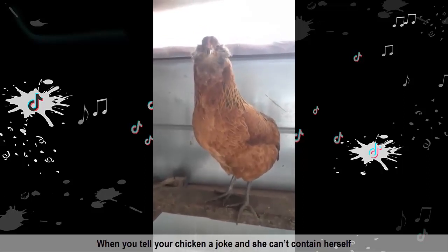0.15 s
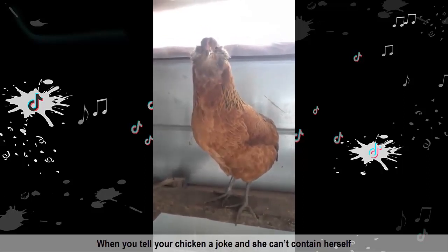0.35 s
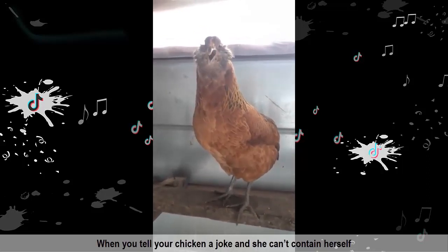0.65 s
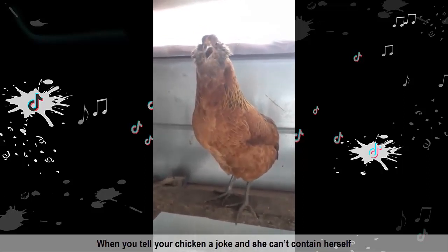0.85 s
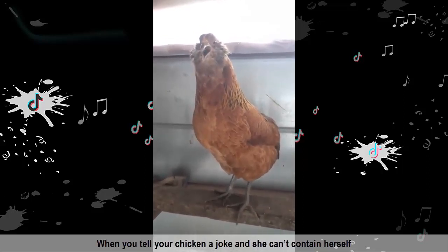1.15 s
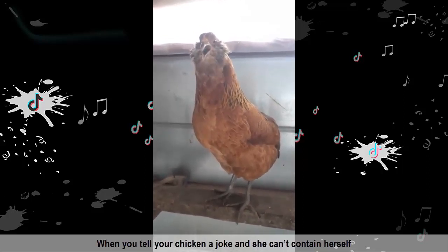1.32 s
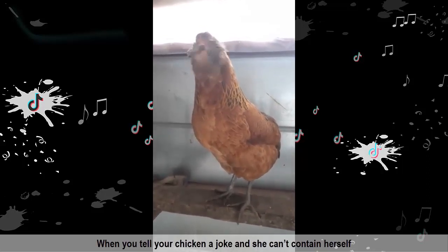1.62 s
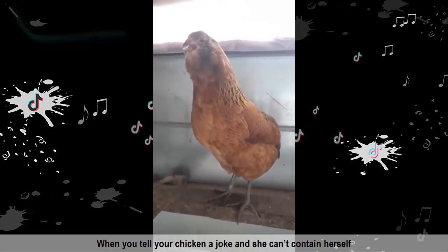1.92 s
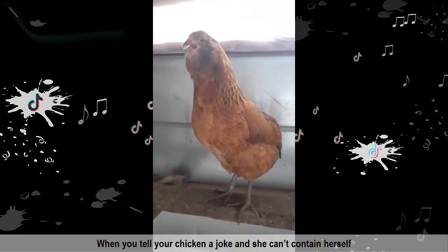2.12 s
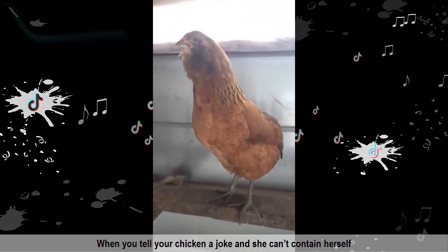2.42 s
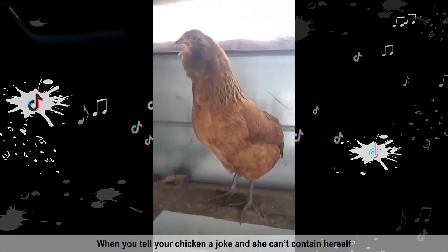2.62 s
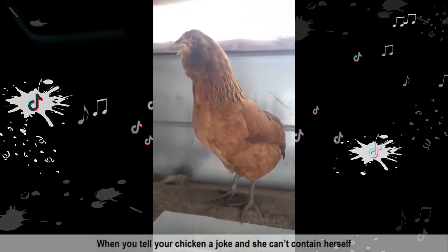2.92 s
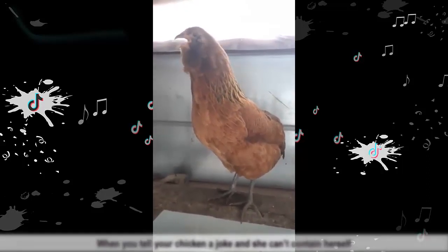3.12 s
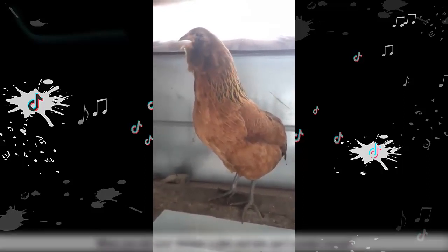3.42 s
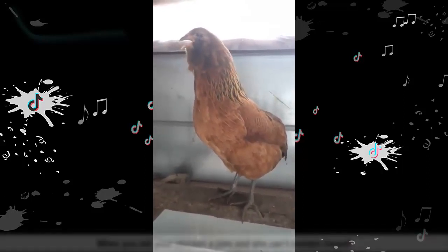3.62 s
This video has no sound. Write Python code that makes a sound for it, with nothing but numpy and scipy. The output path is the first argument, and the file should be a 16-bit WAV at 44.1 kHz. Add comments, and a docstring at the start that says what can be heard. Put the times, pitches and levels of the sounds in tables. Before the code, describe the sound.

Close stereo pickup of a hen in a small coop: a brief quiet start, a growing raspy squawk, then about six clucks per second, dipping softer midway and turning clearer, with a few soft thumps.

```python
"""Hen squawking in a coop

A hen in a small coop gives one swelling squawk, then a fast run of clucks, close to a two-port microphone.
Her voice is a train of pulses and puffs of noise, shaped by throat and beak: low and hoarse, then higher.
Random echoes make the coop's short tail. Shaped noise makes a low rumble with faint hiss,
and dying sine waves make a few soft thumps."""
import sys
import numpy as np
from scipy import signal
from scipy.fft import rfft, irfft
from scipy.io import wavfile
from scipy.ndimage import uniform_filter1d

SR = 44100
rng = np.random.default_rng(int(sys.argv[2]) if len(sys.argv) > 2 else 0)


def generate_wav(signal):
    """Clip the signal to [-1, 1] and save it as 16-bit WAV at the path in sys.argv[1]."""
    frames = np.transpose(np.atleast_2d(signal))
    scaled = np.clip(frames, -1, 1) * 32767
    pcm = np.round(scaled).astype(np.int16)
    wavfile.write(sys.argv[1], SR, pcm)


N = 165375  # length in samples

# The opening squawk. Each row: time in seconds, pitch in Hz, level in dB, roughness 0-1, beak opening 0-1.
SQUAWK = [(.318, 350.9, -74, 0.32, 0.3), (0.327, 358.4, -34, 0.33, 0.12), (.345, 340.3, -34.5, 0.42, 0.2),
          (.37, 343.7, -39.5, 0.51, 0.14), (.385, 352.7, -31.5, 0.28, 0.12),
          (0.399, 179.5, -29.5, 0.54, 0.25), (0.439, 200.1, -29.5, 0.7, 0.29), (.5, 219, -27, 0.6, 0.42),
          (0.574, 240.2, -20.5, .8, 0.64), (0.589, 252.1, -17.5, 0.31, 0.47), (.66, 266, -17, 0.28, 0.99),
          (.69, 282.3, -15.5, 0.75, 0.9), (.705, 425.4, -15, 0, 0.92), (.755, 440, -13, .15, 0.9),
          (0.774, 440.3, -15.5, 0.67, 1), (.81, 449.6, -12, 0.2, 0.85), (.83, 456.7, -14, 0.1, 1),
          (0.879, 446.1, -13, 0.04, 0.96), (.915, 461.2, -14, 0.11, 1), (.93, 459.8, -11, 0.2, 0.97),
          (.955, 455, -16.5, 0.31, 0.97), (0.971, 461, -13.5, .6, 0.97)]
# The clucks. Each row: start in seconds, length in seconds, then pitch in Hz, level in dB and roughness 0-1
# of the low part, time of the flip in seconds after the start, then the same three for the high part.
CLUCKS = [(.972, .105, 304.7, -18, .45, .056, 522.4, -13.5, .85),
          (1.126, .125, 288.3, -18, 0.37, .085, 467.5, -13.5, 0.61),
          (1.302, 0.11, 290.8, -18, .45, .085, 459, -12, 0.66),
          (1.475, .115, 300.6, -18.5, 0.585, .075, 454.5, -18, 0.42),
          (1.645, .105, 296.1, -19, 0.56, .085, 439.4, -21.5, 0.84),
          (1.804, .1, 310.9, -19.5, .55, .085, 442.2, -23.5, 0.9),
          (1.964, .085, 314.7, -20, 0.7, .075, 442.7, -47, 0.79),
          (2.121, .09, 276.7, -20, 0.507, .08, 438.8, -29, 0.94),
          (2.28, .125, 292.9, -19.5, 0.3136, .105, 439.4, -18.5, 0.81),
          (2.478, .1, 301.3, -19, .5, .065, 454.5, -13, 0.21),
          (2.65, 0.096, 306.3, -18.5, .55, .072, 449.7, -12.5, 0.28),
          (2.846, 0.1, 301.4, -18.5, 0.6, .072, 458.4, -10.5, 0.34),
          (3.031, .112, 308.3, -18.5, 0.65, .062, 464.7, -11.5, 0.31),
          (3.218, .1, 334.1, -18.5, 0.85, 0.036, 460.9, -11.5, 0.24),
          (3.39, .1, 323.2, -18.5, 0.443, .045, 472.8, -11.5, 0.17),
          (3.566, 0.11, 321.5, -19.5, 0.644, 0.031, 453.8, -12.5, 0.079),
          (3.743, .1, 296, -26.5, 0.35, 0.057, 452, -12, 0.16)]
# Tone of the throat and open beak. Each row: frequency in Hz, gain in dB.
THROAT = [(100, -46), (300, -26), (450, -14), (620, -14), (780, -6.5), (950, -3), (1150, -4), (1370, -2.5),
          (1480, -2), (1620, -12), (2000, -9), (2350, -14.5), (2650, -22), (3150, -12.5), (3750, -17.5),
          (4250, -28), (4650, -25), (5000, -28.5), (5500, -24.5), (7500, -33), (10300, -35), (11000, -40),
          (13000, -43)]
# Tone of the breath noise before the throat. Each row: frequency in Hz, gain in dB.
PUFF_TONE = [(300, 3), (1500, 3), (3000, 5.5), (6000, 3), (13000, 9)]
# Shut beak compared with open. Each row: frequency in Hz, gain in dB.
SHUT_BEAK = [(200, 11), (680, 13), (1000, 3.5), (1400, -43), (2300, -8), (3500, -28), (5000, -46),
             (13000, -63)]
# High register compared with low. Each row: frequency in Hz, gain in dB.
HIGH_REGISTER = [(300, 2), (1000, -1.5), (1200, 2), (1360, 5), (1550, 10), (1900, -8.5), (2400, 3),
                 (3500, -1), (13000, -0.5)]
# How far the beak points at the microphone. Each row: time in seconds, share 0-1.
FACING = [(0, 1), (1.7, 0.9), (2.5, 0), (3.75, 0.21)]
# Tone when the head is turned away. Each row: frequency in Hz, gain in dB.
TURNED_AWAY = [(1000, 1.5), (9500, 0.5), (11000, -5), (13000, -3)]
# How the two ports differ. Each row: frequency in Hz, left minus right in dB.
LEFT_MINUS_RIGHT = [(60, -.5), (520, -2.5), (740, 1), (1000, -6), (1150, -3), (1310, 6), (1600, -1.5),
                    (2000, 1), (5000, 0), (8700, 6), (13000, 6)]
# Tone of the first echoes. Each row: frequency in Hz, gain in dB.
WALLS_TONE = [(200, -20), (500, -14), (900, -7), (1300, -14), (2000, -2), (4000, 0), (8000, 3)]
# Fading of the first echoes. Each row: frequency in Hz, time to fall by 60 dB in seconds.
WALLS_FADE = [(1000, .08)]
# Tone of the coop's tail. Each row: frequency in Hz, gain in dB.
COOP_TONE = [(250, -11.5), (700, -3), (1400, -10.5), (3000, -11), (10000, -10)]
# Fading of the coop's tail. Each row: frequency in Hz, time to fall by 60 dB in seconds.
COOP_FADE = [(250, 0.36), (660, 0.13), (1740, .22), (4590, 0.23), (10000, 0.15)]
# Soft knocks. Each row: start in seconds, pitch in Hz, level in dB, time to fall by 60 dB in seconds.
THUMPS = [(0.084, 72, -45, 0.44), (1.662, 97, -41, 0.26), (2.112, 211.6, -23, 0.17),
          (2.48, 60.57, -46, .15)]
# Tone of the background air. Each row: frequency in Hz, relative level in dB.
AIR_TONE = [(12, -72), (20, -72), (64, -7), (107, -16.5), (190, -9), (301, -13), (428, -26), (1370, -23.5),
            (9650, -44.5), (13000, -32.5)]
# How alike the air is in both ports. Each row: frequency in Hz, likeness (1 is identical).
AIR_LIKENESS = [(60, 0.94), (300, 0.94), (1000, 0.11), (10000, 0.22)]

ATTACK_S, ATTACK_DB = 0.015, -7  # each cluck starts this much softer
RELEASE_S, RELEASE_DB = 0.022, -25.5  # and fades by this much at its end
FLIP_S, SQUAWK_FLIP_S = 0.006, 0.695  # time a flip takes; when the squawk flips
LOW_DROP, LOW_DROP_S = 0.2, 0.013  # the low pitch drops in from above (share, seconds)
LOW_RISE = 0.16  # then climbs by this share until the flip
HIGH_PEAK = 0.45  # top of the arch, as a share of the high note
HIGH_ARCH, HIGH_SWELL_DB = 0.08, -12.5  # fall in pitch (share) and level, half a note from the top
JITTER, SHIMMER_DB = 0.16, 6  # unevenness of pitch (share) and pulse size at full roughness
BREATH = 0.13  # share of noise left in the clearest notes
SPREAD = 0.012  # lag of the partials, in turns per partial number squared
LEFT_LEAD_S = 12 / 44100  # the left port hears the hen this much earlier
AIR_DB = -54.5  # overall level of the air
EDGE_HZ = 13100  # top of the recorded band


def gain_of(db):
    """Turn decibels into a multiplier."""
    return 10 ** (np.asarray(db) / 20)


def evened(x):
    """Scale to an average (RMS) level of one."""
    return x / np.sqrt(np.mean(x ** 2) + 1e-20)


def read(points, hz):
    """Read a curve between its points, on a logarithmic frequency scale."""
    f, value = np.transpose(points)
    return np.interp(np.log(hz + 1), np.log(f + 1), value)


def colour(x, points):
    """Filter with a dB curve; the filter never sounds ahead of its input."""
    hz = abs(np.fft.fftfreq(8192, 1 / SR))
    log_gain = np.log(gain_of(read(points, hz)))
    # the Hilbert transform gives the phase that puts the energy as early as possible
    response = np.exp(np.conj(signal.hilbert(log_gain)))
    taps = np.fft.ifft(response).real[:4096]
    return signal.oaconvolve(x, taps)[:N]


def blend(share, x, y):
    """Mix two versions: all x at share 1, all y at share 0."""
    return share * x + (1 - share) * y


def gestures():
    """Pitch, level, roughness, beak opening and register: what the hen does with her voice over time."""
    t = np.arange(N) / SR
    rows = np.transpose(SQUAWK)
    hz, db, rough, beak = (np.interp(t, rows[0], row) for row in rows[1:])
    high = np.clip((t - SQUAWK_FLIP_S) / FLIP_S, 0, 1)
    db[(t < rows[0, 0]) | (t > rows[0, -1])] = -120  # practically silent outside the squawk

    for start, length, low_hz, low_db, low_rough, flip, high_hz, high_db, high_rough in CLUCKS:
        on = (t >= start) & (t < start + length + RELEASE_S)
        u = t[on] - start
        up = np.clip((u - flip) / FLIP_S, 0, 1)  # 0 in the low part, 1 in the high part

        drop = LOW_DROP * np.exp(-u / LOW_DROP_S)
        climb = LOW_RISE * ((u / flip) ** 2 - 0.3)
        low_pitch = low_hz * (1 + drop + climb)
        # squared distance from the top of the arch, in half notes
        off = (2 * (u - flip) / max(length - flip, 0.01) - 2 * HIGH_PEAK) ** 2
        high_pitch = high_hz * (1 - HIGH_ARCH * np.minimum(off, 2))
        hz[on] = blend(up, high_pitch, low_pitch)

        attack = ATTACK_DB * np.clip(1 - u / ATTACK_S, 0, 1)
        release = RELEASE_DB * np.clip((u - length) / RELEASE_S, 0, 1)
        high_level = high_db + HIGH_SWELL_DB * np.minimum(off, 1)
        db[on] = blend(up, high_level, low_db) + attack + release
        rough[on] = blend(up, high_rough, low_rough)
        high[on] = up * (1 - high_rough)  # a hoarse high note keeps some of the low tone
    return hz, db, np.clip(rough, 0, 1), np.clip(beak, 0, 1), high


def hen():
    """Pulses, uneven in spacing and size when rough, with a puff of air each cycle, through throat and beak."""
    hz, db, rough, beak, high = gestures()
    wobble = evened(uniform_filter1d(rng.standard_normal(N), size=160))
    uneven_hz = hz * (1 + JITTER * rough ** 2 * np.clip(wobble, -2, 2))
    turns = np.cumsum(uneven_hz) / SR  # cycles counted so far

    # one random size per cycle
    draws = np.clip(rng.standard_normal(N), -2, 1.2)
    size = gain_of(SHIMMER_DB * rough * draws[np.round(turns).astype(int)])
    # higher partials lag, so that a pulse is no single spike
    pulses = evened(sum(np.cos(2 * np.pi * (k * turns - SPREAD * k ** 2)) for k in range(1, 36)))
    # noise is strongest at the start of each cycle, then dies down
    puff_shape = 0.53 + np.exp(-(turns % 1) / 0.54)
    puffs = colour(evened(puff_shape * rng.standard_normal(N)), PUFF_TONE)

    source = np.sqrt(1 - rough ** 2) * size * pulses + np.hypot(rough, BREATH) * puffs
    voice = colour(source, THROAT)
    voice = blend(high, colour(voice, HIGH_REGISTER), voice)
    voice = blend(beak, voice, colour(voice, SHUT_BEAK))
    facing = np.clip(np.interp(np.arange(N) / SR, *np.transpose(FACING)), 0, 1)
    voice = blend(facing, voice, colour(voice, TURNED_AWAY))
    # level the voice out, then give it the loudness of the gestures
    voice /= np.sqrt(abs(uniform_filter1d(voice ** 2, size=1000)) + 1e-12)
    return voice * uniform_filter1d(gain_of(db), size=60)


def ports(x):
    """The two microphone ports hear the hen with their own delay and colour."""
    hz = np.fft.rfftfreq(N, 1 / SR)
    # each port takes half of the difference, in opposite directions
    half = gain_of(read(LEFT_MINUS_RIGHT, hz) / 2) * np.exp(1j * np.pi * hz * LEFT_LEAD_S)
    return irfft(rfft(x) * np.array([half, 1 / half]), N)


def echoes(x, fade, tone, first):
    """Sparse echoes of random sign from sample `first` on, different per port; each band dies at its own speed."""
    taps = np.zeros((2, SR // 2))
    at = np.arange(first, SR // 2 - 20, 20)  # one echo in every 20 samples
    at = at + rng.integers(0, 20, (2, len(at)))
    np.put_along_axis(taps, at, rng.choice([-1., 1.], at.shape), 1)

    hz, t, bands = signal.stft(taps, SR, nperseg=128)
    fall = gain_of(-60 * t / read(fade, hz)[:, None])
    fall /= np.linalg.norm(fall, axis=1)[:, None]  # equal energy in every band
    tail = signal.istft(bands * fall, SR, nperseg=128)[1]
    tail /= np.linalg.norm(tail[0])
    return signal.fftconvolve(colour(x, tone)[None], tail, axes=1)[:, :N]


def thumps():
    """Soft low knocks, perhaps feet on the boards: sine waves that swell for one cycle while dying away."""
    start, hz, db, t60 = np.array(THUMPS).T[:, :, None]
    t = np.maximum(np.arange(N) / SR - start, 0)
    onset = np.minimum(t * hz, 1)
    fading = gain_of(db - 60 * t / t60)
    return (onset * fading * np.sin(2 * np.pi * hz * t)).sum(0)


def air():
    """Low rumble and faint hiss: noise with lumpy loudness, partly shared between the ports."""
    frames, hz = N // 512 + 5, np.fft.rfftfreq(2048, 1 / SR)
    a, b, c, d, lumps = rng.standard_normal((frames, 1025, 5)).T
    lumps = uniform_filter1d(lumps, size=6, axis=0)  # smooth over frequency
    lumps = evened(uniform_filter1d(lumps, size=8, axis=1))  # and over time

    same = np.clip(read(AIR_LIKENESS, hz), -1, 1)[:, None]
    left = a + 1j * b
    right = same * left + np.sqrt(1 - same ** 2) * (c + 1j * d)
    bands = np.array([left, right]) * gain_of(read(AIR_TONE, hz)[:, None] + 2.5 * lumps)
    noise = signal.istft(bands, nperseg=2048, noverlap=1536)[1][:, :N]
    return gain_of(AIR_DB) * evened(noise)


def scene():
    """The hen heard directly, her echoes in the coop, the thumps and the air, added together."""
    voice = hen()
    first_echoes = echoes(voice, WALLS_FADE, WALLS_TONE, first=60)
    coop_tail = echoes(voice, COOP_FADE, COOP_TONE, first=300)
    return ports(voice) + first_echoes + coop_tail + thumps() + air()


def record(dry):
    """Peaks beyond full scale are cut flat, then a low-pass filter removes the highest treble."""
    low_pass = signal.firwin(511, EDGE_HZ, window=("kaiser", 9), fs=SR)
    return signal.oaconvolve(np.clip(dry, -1, 1), low_pass[None], "same")


dry = scene()
out = record(dry)
generate_wav(out)
```